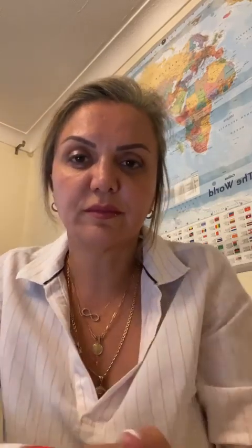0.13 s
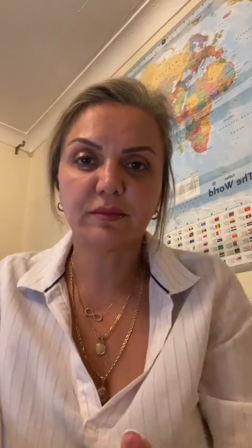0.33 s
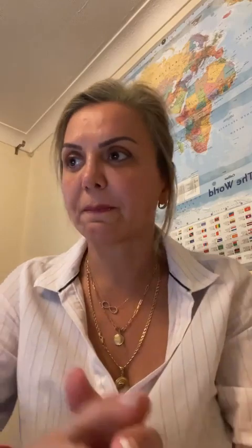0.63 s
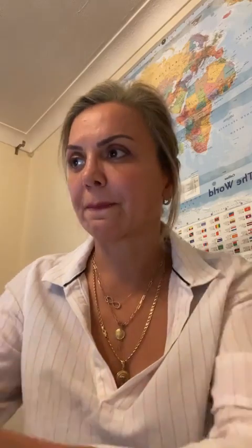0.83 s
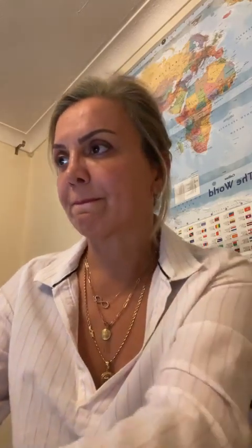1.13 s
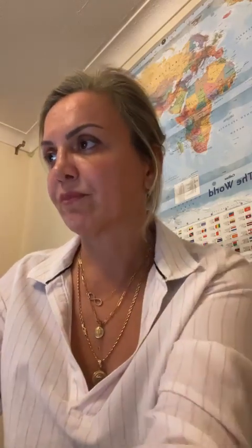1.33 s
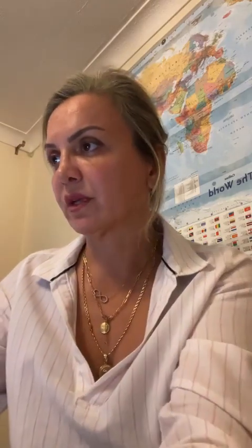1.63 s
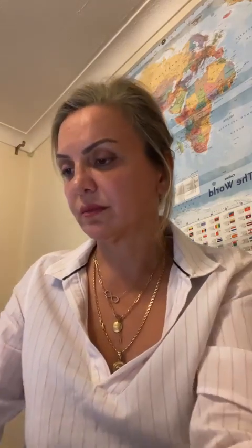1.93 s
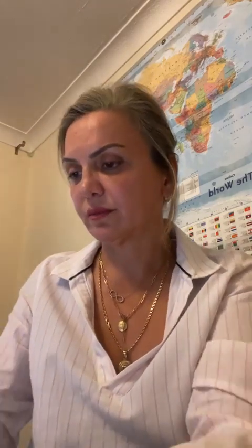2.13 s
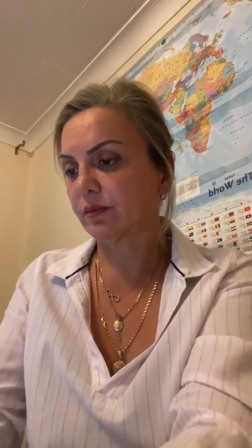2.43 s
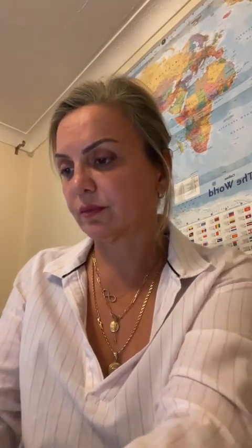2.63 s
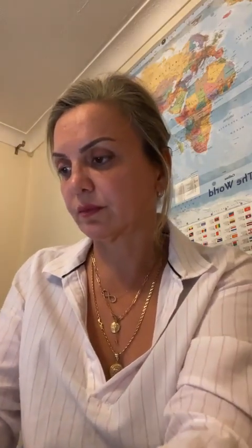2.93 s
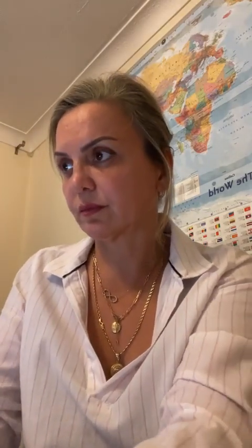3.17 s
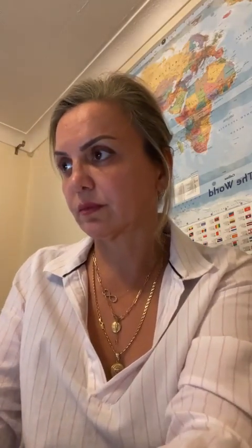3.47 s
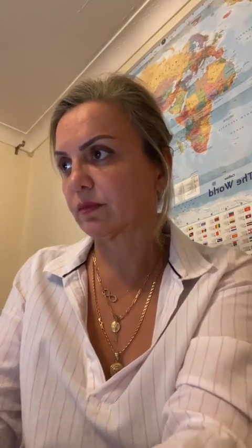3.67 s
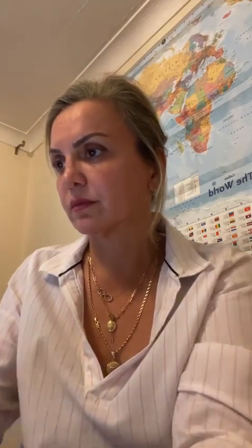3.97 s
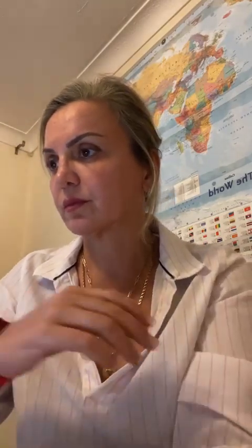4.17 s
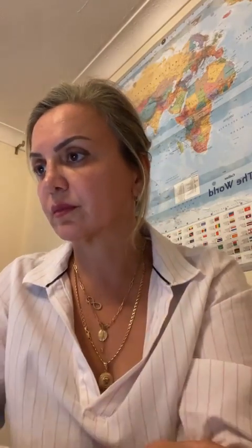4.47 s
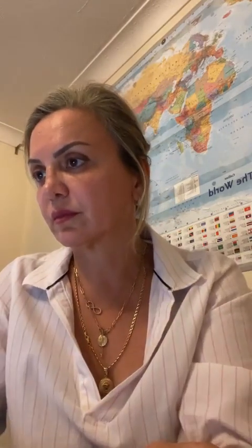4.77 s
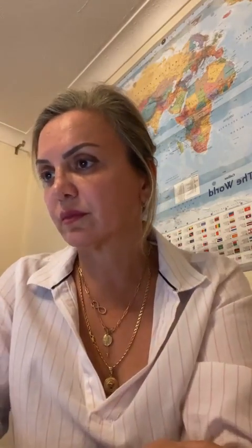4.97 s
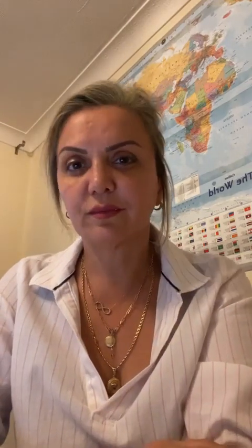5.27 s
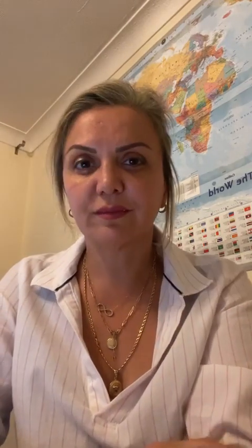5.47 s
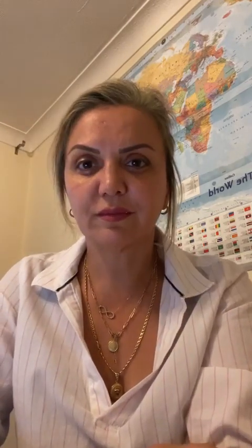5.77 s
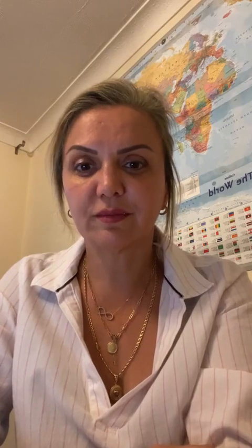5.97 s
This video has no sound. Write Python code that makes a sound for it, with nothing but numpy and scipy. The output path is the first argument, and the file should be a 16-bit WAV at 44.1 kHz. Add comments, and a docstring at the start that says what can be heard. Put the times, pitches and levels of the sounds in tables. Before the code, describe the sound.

A close single microphone in a small quiet room with low, soft air noise. From 0 to 0.9 s sleeves rustle and hands settle on a desk, with small sharp clicks and dull taps around 0.26-0.46 and 0.75-0.83. A heavier low thump lands at 1.25, then soft bumps and bright little clicks, strongest near 1.7. At 2.13 a small hard object is set down with a short clatter and padded knocks. Typing runs from 2.55 to 3.9: about twelve irregular keystrokes, ticking, clacking and thudding into the desk, some faint, those at 3.37 and 3.76 strongest. After a pause, cloth moves and a forearm rubs grainily over the desk edge around 4.2. A low bump at 4.53 and faint knocks follow until 4.77. Then it is nearly still, with one tiny tick at 5.13, while a very faint distant engine hum rises in pitch and grows slightly towards 6 s.

```python
"""Keyboard close to a mono microphone in a small quiet room: someone settles at a desk and types a few keys.
Each key ticks under the finger, clacks at the end of its travel, rings the case, thuds into the desk
and springs back faintly. Keys, clicks and knocks are filtered noise bursts; ringing and bumps are damped sines.
Sleeves, a sliding forearm, leaning and room air are coloured noise; a far engine of summed sines gathers speed."""
import sys
import numpy as np
from scipy import signal
from scipy.io import wavfile
from scipy.ndimage import uniform_filter1d

SR = 44100
rng = np.random.default_rng(int(sys.argv[2]) if len(sys.argv) > 2 else 0)


def generate_wav(sig):
    """Save sig (samples, or channels by samples) to the path in sys.argv[1] as 16-bit PCM at SR."""
    pcm = np.round(np.clip(np.atleast_2d(sig).T, -1, 1) * 32767).astype(np.int16)
    wavfile.write(sys.argv[1], SR, pcm)


N = 269096

# Levels of blows are dry, as energy spread over 10 ms. Spectra are relative.
# room air spectrum: (frequency [Hz], density [dB per Hz])
AIR_SPECTRUM = [(15, -38), (30, -4), (53, 4), (75, -2), (100, -15), (150, -5.5), (190, -8), (260, -12.5),
                (420, -14.5), (600, -22), (1200, -25), (3000, -29), (7000, -32), (15500, -40.5)]
# far engine: (time [s], mean firing rate [Hz], peak level of the first order [dB])
ENGINE_RUN = [(4.2, 141.3, -75), (4.8, 145, -66), (5.35, 153.4, -67), (5.65, 156.7, -69.5),
              (5.85, 162, -62), (6.1, 167.9, -53)]
# engine orders: (multiple of firing rate, relative level [dB])
ENGINE_ORDERS = [(1, 0), (1.5, -14), (2.5, -17)]
# weight leaning on the desk: (heaviest time [s], pressing [s], easing [s], rumble level [dB])
LEANS = [(0, 0.024, 0.067, -51), (.84, .12, 0.064, -56), (2.03, 0.48, 0.13, -53), (3.3, 0.4, 0.2, -61),
         (4.66, 0.44, 0.28, -60.5)]
# desk rumble spectrum: (frequency [Hz], density [dB per Hz])
LEAN_SPECTRUM = [(25, -31), (60, 3.5), (140, -6), (200, -7), (400, -12.5), (800, -28), (2000, -36)]
# arm movements: (fastest time [s], speeding up [s], slowing down [s], rustle level [dB], added fizz [dB])
ARM_MOVES = [(0.016, .1, 0.087, -64, 4), (.212, 0.14, 0.12, -63, 3.5), (.285, 0.024, 0.15, -55.5, 4),
             (.52, 0.14, 0.12, -61.5, -6), (.78, 0.098, 0.13, -54, 1), (.949, .012, 0.014, -76.5, 21),
             (1.06, 0.18, 0.33, -68.5, 3), (1.398, 0.012, .022, -59, -9), (1.57, 0.085, 0.083, -58.5, -0.5),
             (1.75, 0.07, 0.11, -58, -7), (2.055, .225, 0.15, -55.7, 1), (2.44, 0.18, .11, -60.5, 7),
             (2.775, 0.14, 0.095, -58, 1), (2.965, 0.089, 0.11, -59.5, -3), (3.24, 0.16, 0.1, -62.5, -3),
             (3.5, 0.094, .085, -60.5, -3), (4.041, 0.11, .1, -59.5, 2.5), (4.22, 0.12, 0.17, -57.5, -4),
             (4.41, 0.038, 0.099, -65.5, 5), (4.54, 0.043, .055, -62, 7.5), (4.605, .05, 0.074, -61.5, -7)]
# sleeve cloth spectrum: (frequency [Hz], density [dB per Hz])
SLEEVE_SPECTRUM = [(300, -23), (600, -8), (1300, -6), (2700, -1.5), (4200, -1), (6800, -0.5), (9000, -3.5),
                   (12000, -8), (16000, -8.5)]
# small hard things on the desk: (time [s], level [dB], centre [Hz], half-width [octaves], rattle decay [s])
CLICKS = [(.259, -41, 4700, 0.4, 0.00047), (.266, -48, 4030, 3, 0.0012), (0.379, -54, 6900, .1, 0.011),
          (.752, -52, 4940, 3, 0.0013), (1.407, -54.5, 5500, 0.28, 0.0026),
          (1.523, -55.5, 4450, 2.9, 0.0034), (1.585, -57, 2200, 0.15, .01), (1.599, -59, 2590, 2.7, .002),
          (1.688, -47.5, 2400, 1.14, 0.0036), (1.699, -54, 3100, 1.1, 0.0062),
          (1.715, -41.5, 6400, 0.19, 0.00037), (1.715, -38.5, 2600, 1.56, 0.0023),
          (1.729, -50.5, 2980, 0.53, 0.0057), (4.48, -60, 2950, 0.81, 0.0093),
          (5.1293, -66, 4570, 1.3, 0.0036)]
# dull knocks: (time [s], level [dB], upper edge [Hz], rattle decay [s])
KNOCKS = [(.267, -51, 1060, 0.0083), (.337, -46.5, 527, 0.024), (.463, -47.5, 2060, 0.014),
          (.777, -53, 1880, 0.0082), (0.827, -49, 2000, 0.019), (1.253, -42.5, 1980, 0.009),
          (1.599, -53.5, 700, 0.022), (1.688, -51.5, 1500, 0.04), (1.735, -52, 1320, 0.0073),
          (2.1284, -42, 1290, 0.0062), (2.145, -47.5, 1900, 0.063), (2.209, -47.5, 1300, 0.0049),
          (4.565, -56, 1990, 0.033), (4.6, -53.5, 2050, 0.025), (4.656, -56, 1780, 0.01),
          (4.719, -59, 1960, 0.016), (4.765, -56.5, 2030, 0.008)]
# knock spectrum: (frequency [Hz], density [dB per Hz])
KNOCK_SPECTRUM = [(60, -10.5), (250, 5.5), (550, -1), (1000, -4), (1700, -3.5), (3000, -2), (16000, -21)]
# hands and forearms on the desk: (time [s], level [dB], pitch [Hz], decay [s], sway relative to level [dB])
BUMPS = [(0.269, -44, 147, 0.025, -17), (.268, -48.5, 261, 0.02, -30), (0.336, -44, 254, 0.036, -30),
         (0.344, -47, 157, 0.017, -3), (1.256, -32.5, 86.5, 0.016, -8), (1.261, -39, 161.4, 0.016, -22),
         (1.318, -42, 122, 0.046, 5), (1.49, -40, 87, 0.0089, -2.5), (1.531, -39.5, 129, 0.0074, -10),
         (1.597, -45.5, 213, 0.0058, -3), (1.733, -44, 138, 0.035, -1), (2.141, -45.5, 96, 0.012, -1),
         (4.302, -49, 123, 0.01, -5.5), (4.529, -35.5, 94, 0.011, -4.5)]
# small hard object set down: (time [s], level [dB])
LANDINGS = [(2.135, -40)]
# object modes before tuning: (frequency [Hz], relative level [dB], t60 [s])
OBJECT_MODES = [(1700, -2, .022), (2010, -2, .025), (2480, -5, .016), (2850, 2, 0.024), (3338, -7, .009),
                (4000, -4, 0.02), (5030, -11, .011), (7500, -6, .006)]
# keystrokes; the last row is the finger lifting off the key before it: (time [s], finger tick [dB], travel [s],
# clack [dB], keycap pitch [Hz], treble slope [dB per octave], case [dB], case pitch [factor], desk [dB])
KEYSTROKES = [(2.553, -48.5, .0026, -51, 2580, 0.5, -62, 0.96, -47),
              (2.6847, -58, 0.00081, -62.5, 1700, -3, -54, 0.96, -51),
              (2.796, -42, 0.0025, -48, 1910, -2.5, -41, 1.01, -35.5),
              (2.9262, -46, .007, -53.5, 1940, 1.5, -44.5, 1.03, -46.5),
              (3.03, -45, 0.0029, -50.5, 1810, -2.5, -43, 0.88, -38.5),
              (3.173, -52, 0.0043, -53, 1300, -1.5, -51.5, 1.06, -44),
              (3.272, -81, 0.0023, -66, 1320, 0, -61.5, 1.3, -49.5),
              (3.317, -74, 0.0032, -62.5, 1320, -4, -60, 1, -43.5),
              (3.3667, -46.5, 0.0038, -41.5, 2780, -2.5, -39, 1.02, -32.5),
              (3.5239, -44, 0.0037, -48, 2180, 2, -40.5, 1.058, -44),
              (3.7629, -40.5, 0.0039, -34, 1170, 3, -46.5, 0.72, -38.5),
              (3.8603, -41, 0.0013, -48, 3040, 1, -75, .87, -51)]
# finger tick spectrum: (frequency [Hz], density [dB per Hz])
TICK_SPECTRUM = [(200, -22), (900, -4), (2000, -3.5), (4500, -3), (7400, 7.5), (9000, -4), (12000, -4.5),
                 (16000, 5)]
# bottoming clack spectrum: (frequency [Hz], density [dB per Hz])
CLACK_SPECTRUM = [(150, -2.5), (600, -2.5), (1300, -3), (3500, -1.5), (5200, -7.5), (7000, -9.5),
                  (10000, -4), (16000, -15)]
# main keycap resonance: (multiple of keycap pitch, gain [dB])
KEYCAP_RESONANCE = [(.6, -2), (.8, 0), (1, 7), (1.2, 0), (1.6, -2)]
# keyboard case modes before tuning: (frequency [Hz], relative level [dB], t60 [s])
CASE_MODES = [(279, -8, 0.075), (421, -14, 0.062), (526, 1.5, 0.035), (629, -1.5, 0.029), (765, -3, 0.038),
              (1120, -6.5, 0.022)]
# desk modes before tuning: (frequency [Hz], relative level [dB], t60 [s])
DESK_MODES = [(47.7, -3.5, 0.28), (79.4, -11, 0.14), (109, 7.5, 0.051), (142, -1.5, 0.17),
              (218.8, -12.5, 0.21)]
# dull rattle of a returning key: (frequency [Hz], density [dB per Hz])
RETURN_SPECTRUM = [(300, 2), (900, -1), (2000, 3), (4000, -6.5), (16000, -20)]
# forearm sliding back over the desk edge: (fastest time [s], speeding up [s], slowing down [s], level [dB])
SLIDES = [(4.192, .13, .09, -54.6)]
# sliding forearm spectrum: (frequency [Hz], density [dB per Hz])
SLIDE_SPECTRUM = [(600, -12), (1500, -13), (2100, 1), (3000, -1.5), (3700, 5), (5000, -4), (6500, -6),
                  (16000, -29)]
# room decay: (frequency [Hz], t60 [s])
ROOM_DECAY = [(80, 0.29), (400, 0.23), (2000, 0.22), (7000, 0.13), (16000, 0.14)]

AIR_DB = -60.5
SWELL_POWER = 2.27  # 2 is a bell; more holds the top longer and stops sooner
FIZZ_LEAD_S, FIZZ_SPLIT_HZ = 0.004, 9500  # the finest fibres slip first
RETURN_S = 0.068  # key bottom to spring-back
RETURN_CAP_DB, RETURN_CASE_DB = -21, -15  # relative to the case ring of the press
RETURN_DESK_DB = -14.5  # relative to the desk ring of the press
CASE_LAG_S, DESK_LAG_S = 0.0008, 0.008
EDGE_HZ = 15900
AGE_S = np.arange(SR // 2) / SR  # time since a blow
BINS_HZ = np.fft.rfftfreq(4096, 1 / SR)


def amp(db):
    """Decibels to gain."""
    return 10 ** (np.asarray(db) / 20)


def evened(x):
    """Scales to rms 1."""
    return x / np.sqrt(np.mean(x ** 2) + 1e-20)


def blow(x, db):
    """Gives a short sound the energy of 10 ms at this level."""
    return amp(db) * x / np.sqrt(np.sum(x ** 2) * 100 / SR)


def read(points, hz):
    """Interpolates a table on a log-frequency axis."""
    table_hz, value = np.transpose(points)
    return np.interp(np.log(hz + 1), np.log(table_hz + 1), value)


def add(mix, s, sound):
    """Mixes a sound in at time s."""
    part = mix[max(round(s * SR), 0):][:len(sound)]
    part += sound[:len(part)]


def colour(x, db):
    """Causal minimum-phase filter with the given gain at BINS_HZ."""
    both_sides_db = np.r_[db, db[-2:0:-1]]
    log_gain = np.log(amp(np.maximum(both_sides_db, -100)))
    taps = np.fft.ifft(np.exp(np.conj(signal.hilbert(log_gain)))).real
    return signal.oaconvolve(x, taps)[:len(x)]


def smooth_noise(length, size):
    """Slow random curve of rms 1, averaged over size samples."""
    return evened(uniform_filter1d(rng.standard_normal(length), size))


def hiss(spectrum, grain_db, size):
    """Coloured noise of rms 1 whose strength flickers over about size samples."""
    flicker = smooth_noise(N, size)
    grains = rng.standard_normal(N) * amp(grain_db * flicker)
    return evened(colour(grains, read(spectrum, BINS_HZ)))


def contact(rattle_s, snap):
    """One hard impulse with a dying rattle."""
    chatter = rng.standard_normal(len(AGE_S)) * np.exp(-AGE_S / max(rattle_s, 1e-4))
    return chatter / np.linalg.norm(chatter) + snap * (AGE_S == 0)


def soft_push(rise_s):
    """Gradual onset of a soft blow."""
    return 1 - np.exp(-(AGE_S / rise_s) ** 2)


def ring(modes, pitch, rise_s, scatter):
    """Damped modes under a soft push; each spot struck tunes them a little differently."""
    tones = np.zeros(len(AGE_S))
    for k, (hz, db, t60_s) in enumerate(modes):
        tuned_hz = hz * pitch * (1 + scatter * rng.standard_normal())
        decay = amp(db - 60 * AGE_S / t60_s)
        tones += (-1) ** k * decay * np.sin(2 * np.pi * tuned_hz * AGE_S)
    return tones * soft_push(rise_s)


def swing(hz, decay_s, rise_s):
    """One damped vibration under a soft push."""
    return np.sin(2 * np.pi * hz * AGE_S) * np.exp(-AGE_S / decay_s) * soft_push(rise_s)


def swell(peak_s, rise_s, fall_s, db):
    """A limb gathers speed and slows; its friction gain follows the same bell."""
    t = np.arange(N) / SR - peak_s
    width_s = np.maximum(np.where(t < 0, rise_s, fall_s), 1e-3)
    return amp(db) * np.exp(-np.minimum(abs(t / width_s), 10) ** SWELL_POWER)


def together(gains):
    """Overlapping movements add in power."""
    return np.sqrt(sum(gain ** 2 for gain in gains))


def room(x, wet_db):
    """Adds the small room: sparse random reflections, treble dying first."""
    at = np.arange(180, len(AGE_S) - 12, 12)
    taps = np.zeros(len(AGE_S))
    taps[at + rng.integers(0, 12, len(at))] = rng.choice([-1, 1], len(at))
    hz, t, cells = signal.stft(taps, SR, nperseg=256)
    decay = amp(-60 * t / read(ROOM_DECAY, hz)[:, None])
    tail = signal.istft(cells * decay, SR)[1]
    return x + amp(wet_db) * signal.fftconvolve(x, tail / np.linalg.norm(tail))[:N]


def room_air():
    """Still air: mostly low, slightly uneven noise."""
    return amp(AIR_DB) * hiss(AIR_SPECTRUM, grain_db=-1.3, size=2500)


def far_engine():
    """Low engine orders come through the wall, locked to one unsteady firing rate."""
    s, rate_hz, rate_db = np.transpose(ENGINE_RUN)
    t = np.arange(N) / SR
    hz, level_db = np.interp(t, s, rate_hz), np.interp(t, s, rate_db)
    wobble = 1 + 0.0072 * smooth_noise(N, size=3000)
    turns = np.cumsum(hz * wobble) / SR
    engine = sum(amp(db) * np.sin(2 * np.pi * order * turns) for order, db in ENGINE_ORDERS)
    return amp(level_db) * engine


def leans():
    """Weight pressing and easing makes the desk rumble."""
    return together(swell(*row) for row in LEANS) * hiss(LEAN_SPECTRUM, grain_db=1.5, size=1500)


def sleeves():
    """Cloth fibres catch and slip as the arms move."""
    cloth = hiss(SLEEVE_SPECTRUM, grain_db=1.0, size=30)
    high_pass = signal.butter(2, FIZZ_SPLIT_HZ, "high", fs=SR, output="sos")
    fizz = signal.sosfiltfilt(high_pass, cloth)  # the finest slips
    coarse_gain = together(swell(s, rise_s, fall_s, db) for s, rise_s, fall_s, db, _ in ARM_MOVES)
    fine_gain = together(swell(s - FIZZ_LEAD_S, rise_s, fall_s, db + fizz_db)
                         for s, rise_s, fall_s, db, fizz_db in ARM_MOVES)
    return coarse_gain * (cloth - fizz) + fine_gain * fizz


def clicks(skirt_db=14, top_hz=7800, top_db_per_octave=11):
    """Small hard things touch the desk, each with one broad resonance."""
    out = np.zeros(N)
    # even a hard contact takes some time
    contact_loss_db = top_db_per_octave * np.log2(np.maximum(BINS_HZ / top_hz, 1))
    for s, db, hz, octaves, rattle_s in CLICKS:
        offset = np.log2((BINS_HZ + 1) / hz) / octaves
        resonance_db = -skirt_db * np.log10(1 + offset ** 4)
        add(out, s, blow(colour(contact(rattle_s, snap=0.43), resonance_db - contact_loss_db), db))
    return room(out, wet_db=-9)


def knocks(slope_db=12, scuff_db=3):
    """Padded blows: soft contact rounds off the treble, skin scuffs unevenly, the room carries on."""
    out = np.zeros(N)
    for s, db, edge_hz, rattle_s in KNOCKS:
        padding_db = slope_db * np.log10(1 + (BINS_HZ / edge_hz) ** 6)
        scuff = amp(scuff_db * smooth_noise(len(AGE_S), size=130))
        hit = contact(rattle_s, snap=0.48) * scuff
        add(out, s, blow(colour(hit, read(KNOCK_SPECTRUM, BINS_HZ) - padding_db), db))
    return room(out, wet_db=-0.5)


def bumps(sway_hz=52):
    """A hand's weight swings the desk top for a few cycles; the whole desk sways more slowly."""
    out = np.zeros(N)
    for s, db, hz, decay_s, sway_db in BUMPS:
        add(out, s, blow(swing(hz, decay_s, rise_s=0.0072), db))
        add(out, s, blow(swing(sway_hz, decay_s=0.027, rise_s=0.027), db + sway_db))
    return room(out, wet_db=-10.5)


def set_down():
    """A small hard object chatters as it lands, exciting its own brief modes."""
    out = np.zeros(N)
    for s, db in LANDINGS:
        chatter = contact(rattle_s=0.003, snap=0.65)
        modes = ring(OBJECT_MODES, 0.99, rise_s=0.0004, scatter=0.005)
        add(out, s, blow(signal.fftconvolve(chatter, modes), db))
    return room(out, wet_db=-10)


def shell(ripple_db=2):
    """Uneven broad plastic resonances of a hollow keycap, drawn afresh, in dB at BINS_HZ."""
    window = signal.windows.hann(151)
    return ripple_db * evened(signal.oaconvolve(rng.standard_normal(len(BINS_HZ)), window, "same"))


def keyboard():
    """Finger ticks on cap; key bottoms out, rings case, shakes desk, then springs back with a faint rattle."""
    caps, body = np.zeros((2, N))
    for s, tick_db, travel_s, clack_db, cap_hz, treble_db, case_db, pitch, desk_db in KEYSTROKES:
        # a nail is brighter than a fingertip
        touch_db = shell() + treble_db * np.log2(np.maximum(BINS_HZ / 4000, 1))
        tick = colour(contact(rattle_s=0.0028, snap=0.61), read(TICK_SPECTRUM, BINS_HZ) + touch_db)
        add(caps, s, blow(tick, tick_db))

        bottom_s = s + travel_s
        cap_db = read(CLACK_SPECTRUM, BINS_HZ) + read(KEYCAP_RESONANCE, BINS_HZ / cap_hz) + touch_db
        clack = colour(contact(rattle_s=0.0028, snap=0.47), cap_db)
        case = ring(CASE_MODES, pitch, rise_s=0.00079, scatter=0.062)
        desk = ring(DESK_MODES, 0.98, rise_s=0.0046, scatter=0.023)
        add(caps, bottom_s, blow(clack, clack_db))
        add(body, bottom_s + CASE_LAG_S, blow(case, case_db))
        add(body, bottom_s + DESK_LAG_S, blow(desk, desk_db))

        top_s = bottom_s + RETURN_S
        rattle = colour(contact(rattle_s=0.005, snap=0.28), read(RETURN_SPECTRUM, BINS_HZ) + shell())
        add(caps, top_s, blow(rattle, case_db + RETURN_CAP_DB))
        add(body, top_s + CASE_LAG_S, blow(case, case_db + RETURN_CASE_DB))
        add(body, top_s + DESK_LAG_S, blow(desk, desk_db + RETURN_DESK_DB))
    return room(caps, wet_db=-8) + room(body, wet_db=-9)


def forearm_slide():
    """A forearm rubs back over the desk edge: grainy friction noise."""
    return together(swell(*row) for row in SLIDES) * hiss(SLIDE_SPECTRUM, grain_db=2.0, size=90)


def scene():
    """All sources reach one microphone; both channels are alike."""
    steady = room_air() + far_engine()
    friction = leans() + sleeves() + forearm_slide()
    blows = clicks() + knocks() + bumps() + set_down() + keyboard()
    mono = steady + friction + blows
    return np.array([mono, mono])


def record(dry):
    """The recorder's band limit: low-pass at EDGE_HZ."""
    taps = signal.firwin(511, EDGE_HZ, window=("kaiser", 9), fs=SR)
    return signal.oaconvolve(dry, taps[None], "same")


dry = scene()
out = record(dry)
generate_wav(out)
```